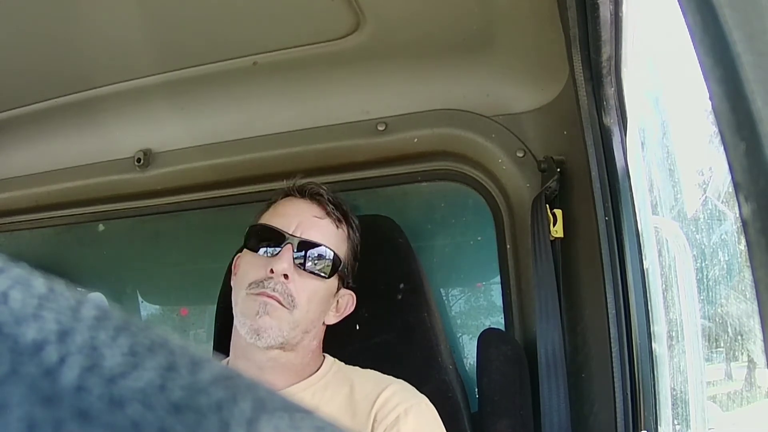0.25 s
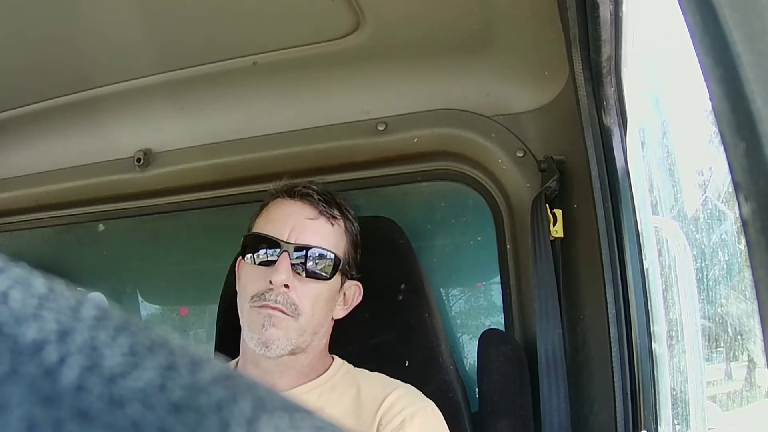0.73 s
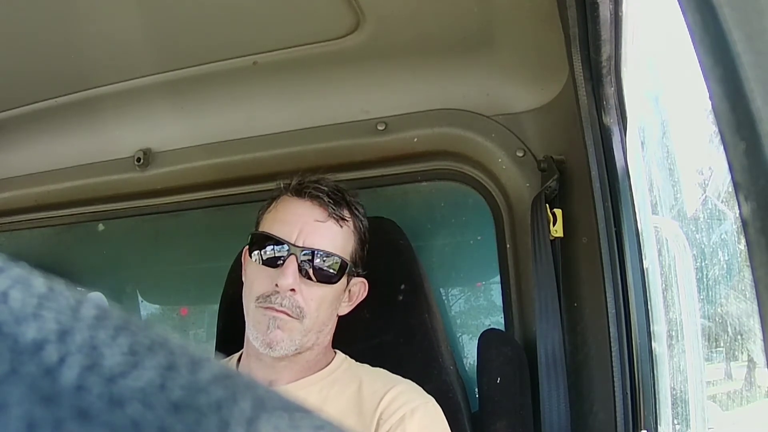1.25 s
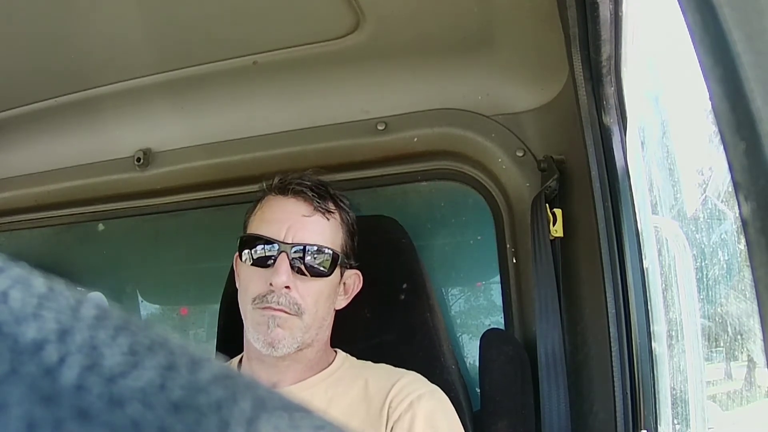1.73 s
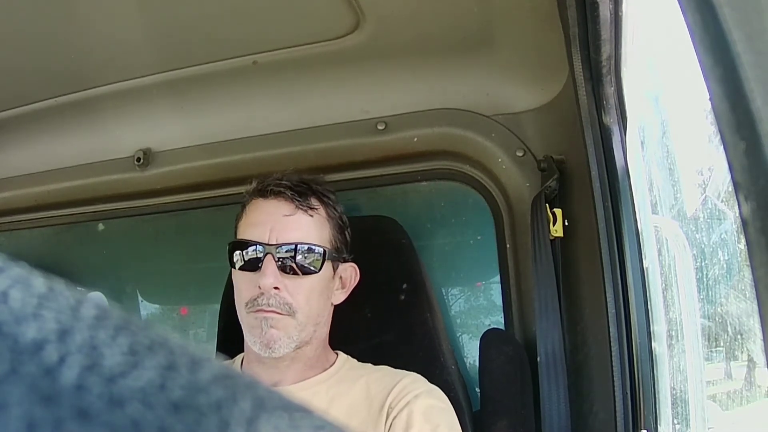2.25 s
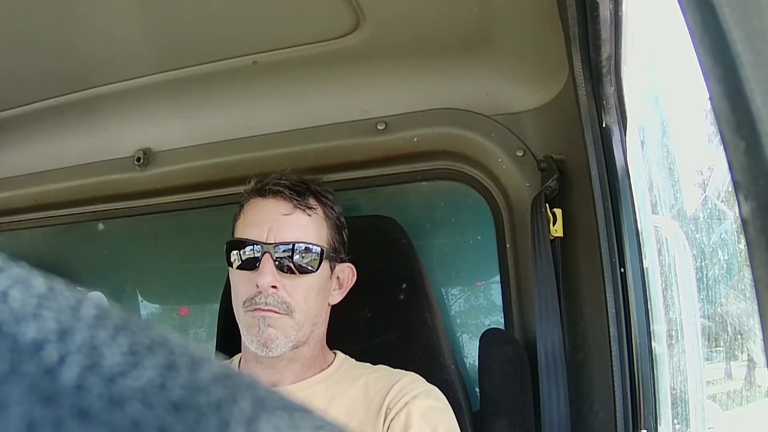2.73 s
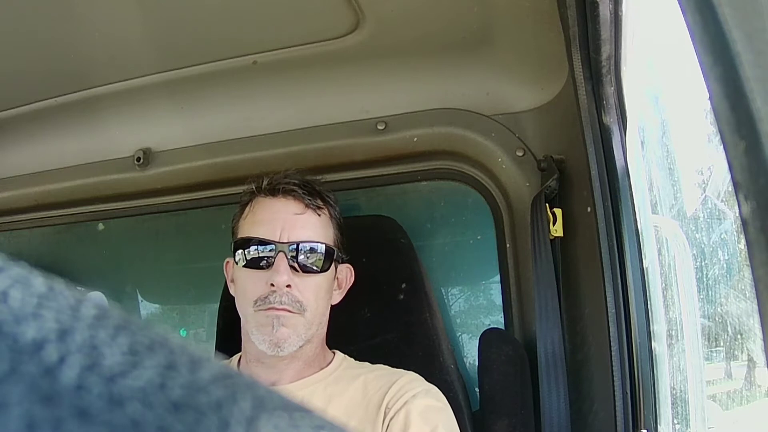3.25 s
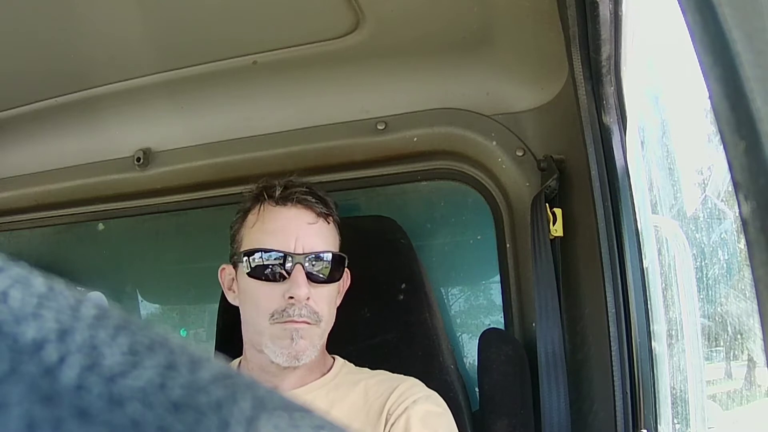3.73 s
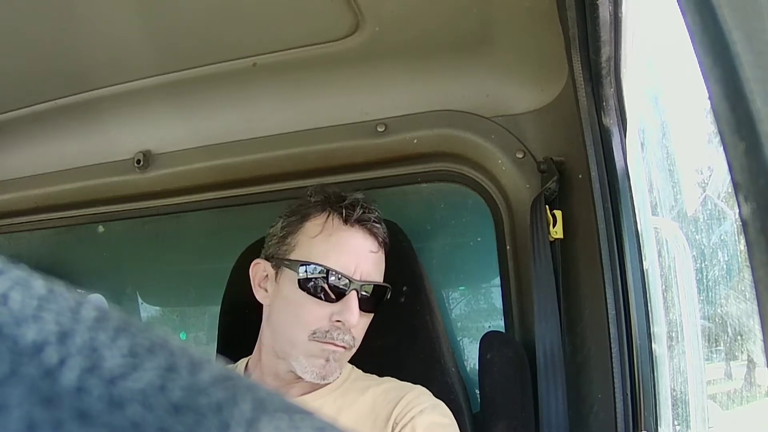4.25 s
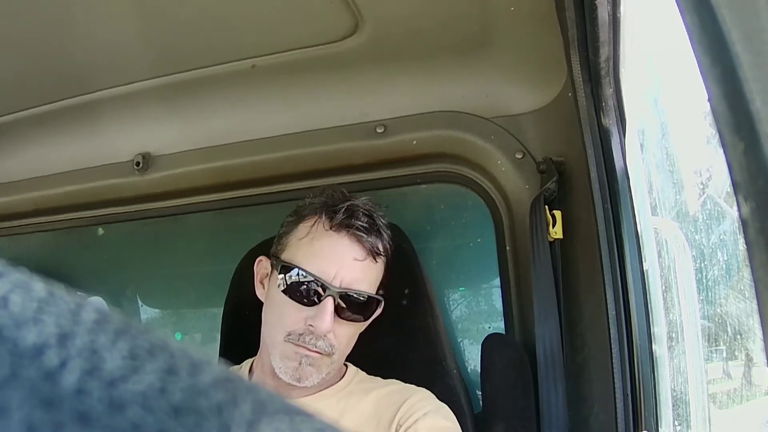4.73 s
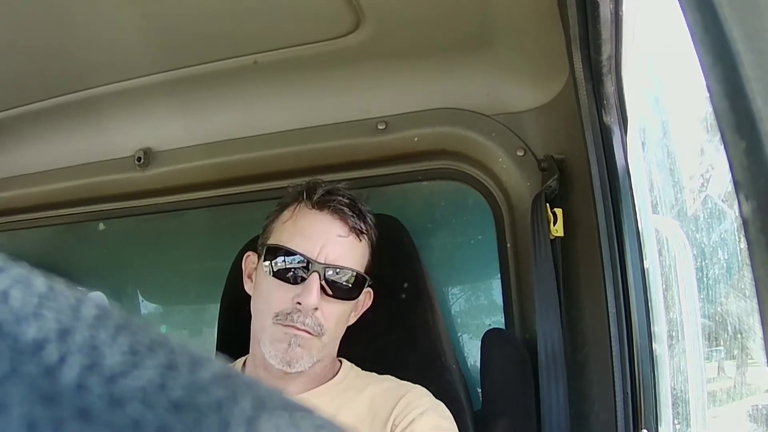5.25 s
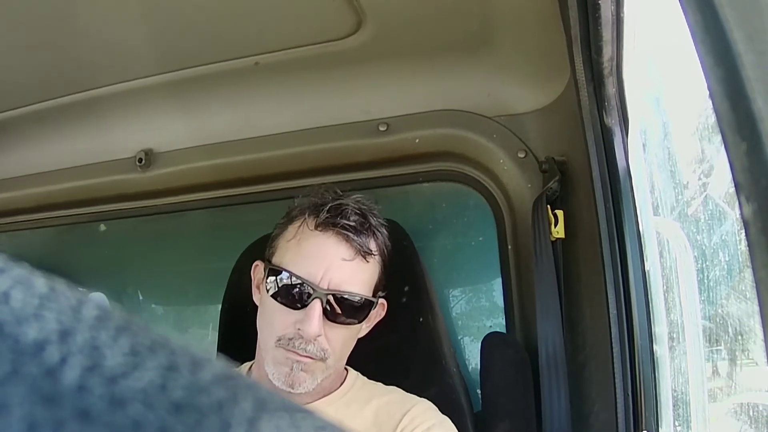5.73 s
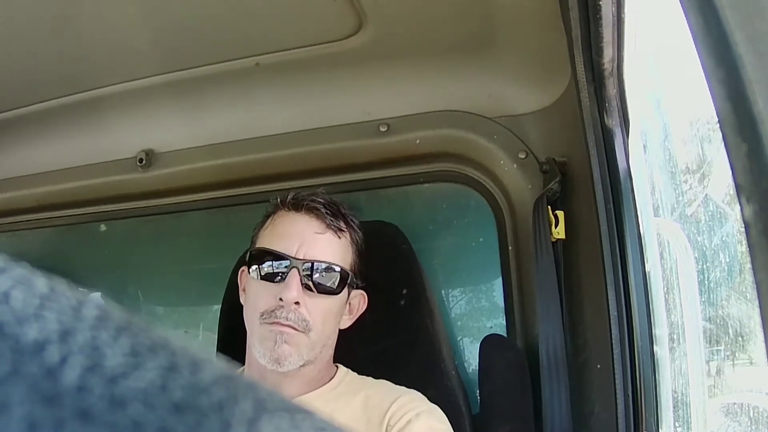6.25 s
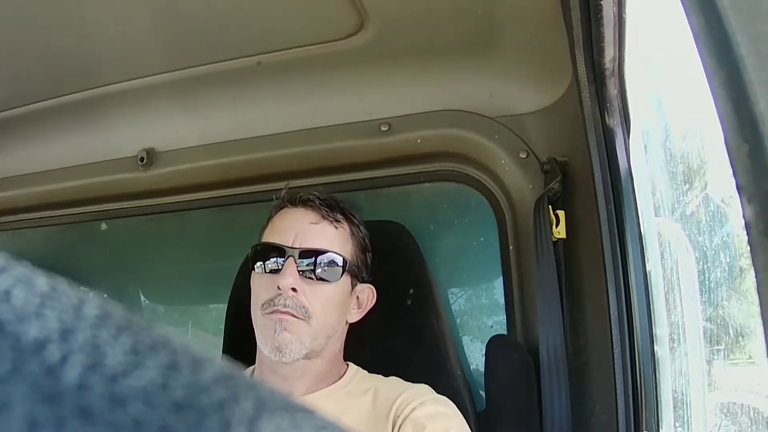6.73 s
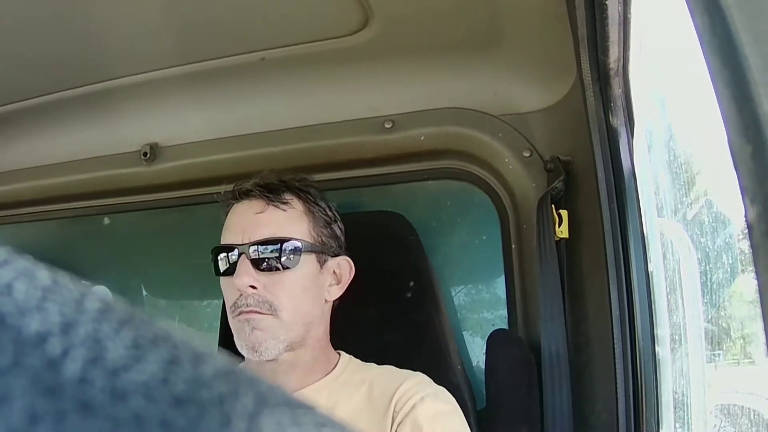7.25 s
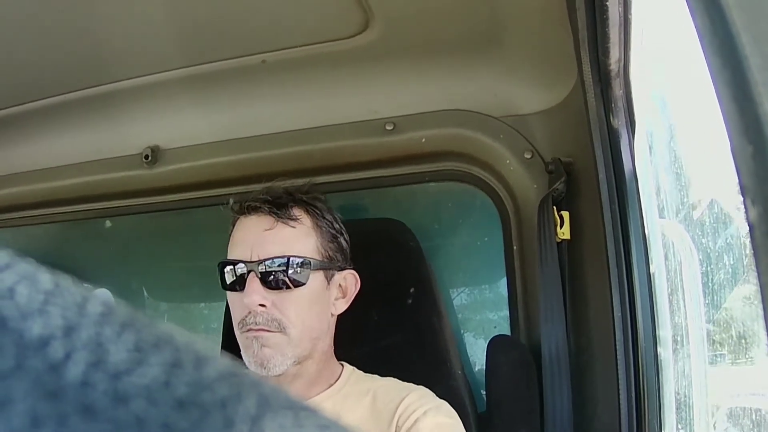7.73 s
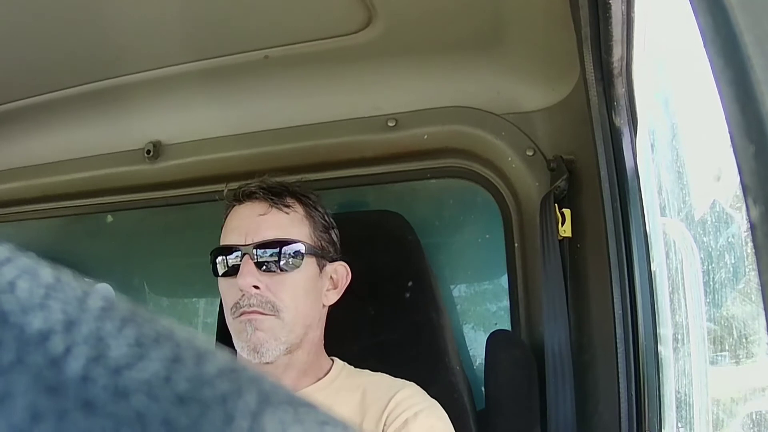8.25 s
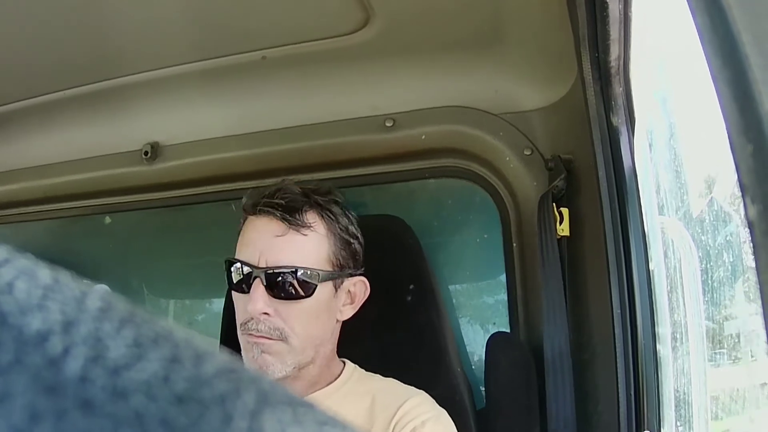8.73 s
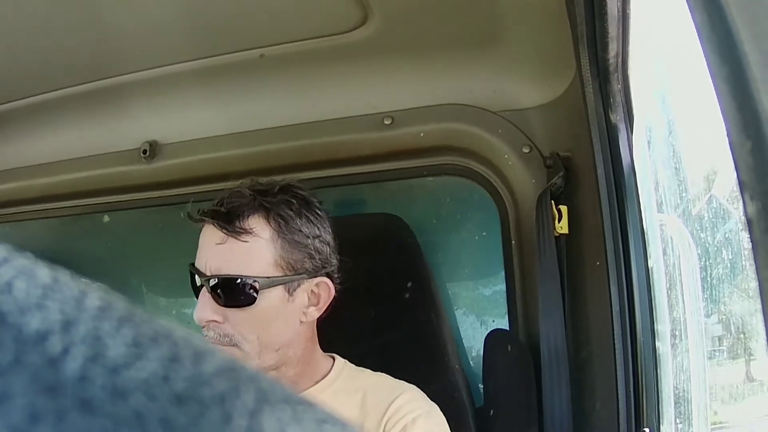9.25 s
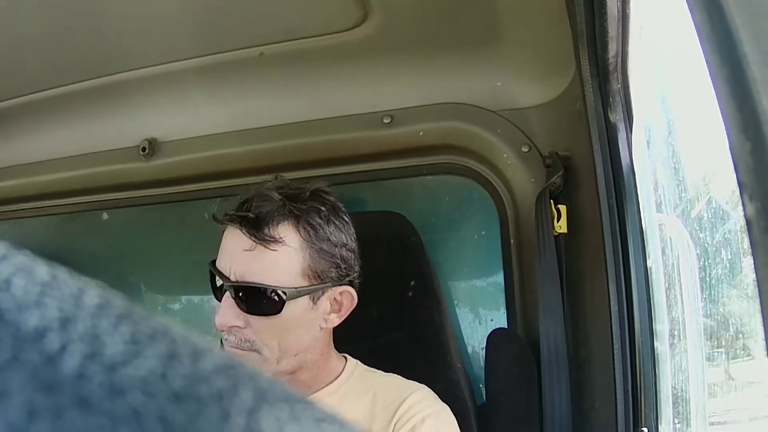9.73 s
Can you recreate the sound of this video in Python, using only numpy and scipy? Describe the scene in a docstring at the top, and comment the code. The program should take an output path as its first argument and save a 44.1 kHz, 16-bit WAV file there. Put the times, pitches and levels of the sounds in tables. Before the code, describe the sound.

Heard close up inside a truck cab, a diesel engine rumbles at a steady idle, then dips and shakes with a brief clatter as it takes the load. Its drone rises and falls three times as the truck moves off, with faint whines, squeaks and a thin turbo whistle. Late on, the gear lever clunks twice, with a short spit of air in between.

```python
"""Inside the cab of a six-cylinder diesel truck. The engine idles, lugs and shudders as the clutch bites,
then pulls away on three pushes of the pedal, the turbo whistling up behind each. Periodic combustion
forces the floor and panels into vibration, and the cab's resonances shape it into boom, drone and
clatter. Gears whine, loose trim rattles, the gear lever knocks home and an air valve spits a short jet."""
import sys
import numpy as np
from scipy import signal
from scipy.fft import rfft, irfft, next_fast_len
from scipy.io import wavfile
from scipy.ndimage import uniform_filter1d, map_coordinates

SR = 44100
rng = np.random.default_rng(int(sys.argv[2]) if len(sys.argv) > 2 else 0)


def unload_wav(signal):
    """Save mono or channel-first audio to the path in sys.argv[1] as 16-bit WAV at rate SR, clipped to [-1, 1]."""
    wavfile.write(
        sys.argv[1],
        SR,
        np.round(np.clip(np.atleast_2d(signal).T, -1, 1) * 32767).astype(np.int16),
    )


N = 440118
TIME = np.arange(N) / SR


def from_db(db):
    """Amplitude grows tenfold for every 20 dB."""
    return 10 ** (np.asarray(db) / 20)

def unit_rms(x):
    """Normalisation to a mean power of 1."""
    return x / np.sqrt(np.mean(x ** 2) + 1e-20)

def drift(rate):
    """Random modulation: rms 1, with `rate` new values a second."""
    knots = rng.standard_normal(12000)
    return unit_rms(np.interp(TIME * rate, np.arange(len(knots)), knots))

def tone(cycles):
    """Harmonic motion: a sine of rms 1 with a random starting phase."""
    return np.sqrt(2) * np.sin(2 * np.pi * (cycles + rng.random()))

def ring(x, hz, t60):
    """A damped resonator: a unit impulse starts a sine that falls 60 dB in t60 seconds."""
    r, w = from_db(-60 / (t60 * SR)), 2 * np.pi * hz / SR
    return signal.lfilter([0, np.sin(w)], [1, -2 * r * np.cos(w), r * r], x + 1e-18)

def lowpass(x, hz, order):
    """Butterworth filtering: 6 dB per octave per order above the corner."""
    return signal.sosfilt(signal.butter(order, hz, fs=SR, output="sos"), x)

def coloured(x, spectrum, resonances=()):
    """Source and filter: a curve of (Hz, dB) plus peaks of (Hz, width in Hz, dB) shapes x; rms 1."""
    size = next_fast_len(N)
    hz = np.arange(size // 2 + 1) * SR / size + 1e-3
    curve_hz, curve_db = np.transpose(spectrum)
    db = np.interp(np.log(hz), np.log(curve_hz), curve_db)
    db -= 24 * np.maximum(np.log2(curve_hz[0] / hz), 0)
    db -= 9 * np.maximum(np.log2(hz / curve_hz[-1]), 0)
    for centre, width, lift_db in resonances:
        db += lift_db / (1 + (2 * (hz - centre) / width) ** 2)
    return unit_rms(irfft(rfft(x, size) * from_db(db), size)[:N])

def noise(spectrum, resonances=()):
    """Filtered white noise takes on the spectrum of its filter; rms 1."""
    return coloured(rng.standard_normal(N), spectrum, resonances)

def held(start, end, attack, release):
    """A trapezoidal envelope, 0-1, that rises from `start` and falls from `end`; all in seconds."""
    return np.clip(np.minimum((TIME - start) / attack, 1 - (TIME - end) / release), 0, 1)

def bursts(rows):
    """Transient envelopes: a linear rise, then exponential decay."""
    out, t = np.zeros(N + SR), TIME[:SR // 3]
    for start, db, rise, decay in rows:
        envelope = np.minimum(t / rise, 1) * np.exp(-np.maximum(t - rise, 0) / decay)
        out[round(start * SR):][:len(t)] += from_db(db) * envelope
    return out[:N]

IDLE_RATE = 40.03  # firings per second
# Engine speed. Each row: time in seconds, firings per second.
ENGINE_SPEED = [(3.7, IDLE_RATE), (4.22, 43.9), (5.2, 31.4), (5.45, 40.3), (6.0, 56.6), (6.5, 72.5),
                (6.93, 81.7), (7.12, 68.6), (7.5, 57.5), (7.75, 63), (8.05, 67), (8.3, 55.5), (8.7, 55),
                (9.2, 53.2), (9.65, 64.4), (9.98, 61)]
def firing_rate():
    """The forcing frequency in Hz: three firings to each turn of the crankshaft."""
    return np.interp(TIME, *np.transpose(ENGINE_SPEED))

def clutch():
    """Friction coupling, 0-1: the clutch takes up the drive."""
    return np.interp(TIME, (3.64, 5.42), (0, 1))

def lug():
    """Overload, 0-1: the engine labours as the clutch bites."""
    return held(4.885, 5.21, attack=0.078, release=0.2)

# Pushes on the pedal. Each row: start in seconds, release in seconds, added share of full depth.
PUSHES = [(5.825, 6.81, 0.77), (7.453, 8.018, 0.56), (8.714, 9.574, 0.66)]
def pedal():
    """Throttle by superposition: a step to a light resting depth, plus the pushes."""
    resting = 0.33 * (TIME > 4.6)
    return resting + sum(depth * held(start, end, 0.63, 0.22) for start, end, depth in PUSHES)

def effort_db(law):
    """Level follows load. A law lists, in dB: base, gain in gear, at full pedal, per octave, in the lug."""
    base_db, gear_db, pedal_db, octave_db, lug_db = law
    octaves = np.log2(firing_rate() / IDLE_RATE)
    return base_db + gear_db * clutch() + pedal_db * pedal() + octave_db * octaves + lug_db * lug()

def critical_db(hz, half_width_hz, lift_db):
    """Resonance: the level swells with the pedal as the firing rate crosses a critical speed."""
    return lift_db * pedal() * np.exp(-((firing_rate() - hz) / half_width_hz) ** 2)

# Load laws of the shudder and the boom, in dB, ordered as in effort_db.
SHUDDER_LAW = (-40.5, -4.5, 4, -7.5, 2.5)
BOOM_LAW = (-42.5, 6.5, -1.5, 6, 6.5)
# Jolts of the cab. Each row: centre and half-length in seconds, shudder lift and boom lift in dB.
JOLTS = [(0.548, 0.21, 0, 4), (3.94, 0.12, 4, 10), (4.282, .1, 4, 6.5), (4.994, 0.19, 15, 5),
         (5.302, 0.054, -4, 7.5), (5.457, 0.14, 12, 0.5), (6.048, 0.065, 10, 8.5), (6.583, 0.028, 6, 8),
         (6.924, 0.088, 4, 2.5), (8.41, 0.1, 10.5, 2), (9.106, 0.19, 15, 5.5), (9.72, 0.18, 9, 0.5)]
def floor_levels():
    """Forced vibration: shudder and boom, in dB, follow the load and the cab's rocking on its mounts."""
    shudder_db = effort_db(SHUDDER_LAW)
    boom_db = effort_db(BOOM_LAW) + critical_db(hz=84.7, half_width_hz=7.5, lift_db=13.4)
    for centre, half_length, shudder_lift_db, boom_lift_db in JOLTS:
        swell = np.exp(-((TIME - centre) / half_length) ** 2)
        shudder_db += shudder_lift_db * swell
        boom_db += boom_lift_db * swell
    return shudder_db, boom_db

def panel_resonance_db():
    """The panels resonate at a critical speed of their own."""
    return critical_db(hz=71.4, half_width_hz=3.04, lift_db=7.3)

def combustion(firings, repeat, throb_db, uneven_db):
    """Cyclic excitation: a six-firing pattern (power share `repeat`) and turbulence pulse each stroke."""
    pattern = rng.standard_normal(2048)
    cycle = map_coordinates(pattern, [firings / 6 % 1 * len(pattern)], order=1, mode="grid-wrap")
    shake = np.sqrt(repeat) * unit_rms(cycle) + np.sqrt(1 - repeat) * rng.standard_normal(N)
    strength_db = uneven_db * rng.standard_normal(1000)[firings.astype(int)]
    return shake * from_db(strength_db - throb_db * (firings % 1 - .5))

# Resonances of the cab. Each row: frequency in Hz, width in Hz, lift in dB.
CAB_MODES = [(112.2, 5.4, 6.5), (165, 21.3, 17), (321.7, 17, 10.5), (477.7, 53, 10.5), (612.5, 57, 8),
             (709, 40, 7), (1046, 230, 10.5), (4370, 500, 3.5), (4840, 180, 4.5)]
# Responses of four paths into the cab. Each row: frequency in Hz, relative gain in dB.
BOOM_PATH = [(30, -6), (55, -20), (85, -3), (130, -3.5), (190, -7.5), (260, -17), (500, -45)]
DRONE_PATH = [(120, -52), (200, 3), (260, -4.5), (380, -7), (520, -7.5), (680, -32.5), (1400, -62)]
CLATTER_PATH = [(350, -29), (560, -3), (850, 2.5), (1080, -11), (1300, -8), (1600, -18.5), (2200, -26.5),
                (5000, -47)]
HISS_PATH = [(1000, -25.5), (1600, 6.5), (2000, 3), (2600, -2), (3400, -11.5), (4500, -10), (5700, -17.5),
             (7300, -19.5), (9000, -30)]
# Load laws of the upper three paths, in dB, ordered as in effort_db.
DRONE_LAW = (-47.5, -0.5, 5.5, 6, 10.5)
CLATTER_LAW = (-49.5, 3.5, 4.5, 5, 6.5)
HISS_LAW = (-67.5, 3, 6, 3, 6.5)
def engine_in_cab(firings, in_gear):
    """Transmission: floor, panels and firewall filter the combustion, which throbs harder in the lug."""
    boom_db, lugging = floor_levels()[1], lug()
    boom = combustion(firings, repeat=0.028, throb_db=-1, uneven_db=1 + 1.6 * in_gear)
    drone = combustion(firings, repeat=0.13, throb_db=0.5, uneven_db=1.05)
    clatter = combustion(firings, repeat=0.16, throb_db=0.3 + 7.1 * lugging, uneven_db=0.54 + lugging)
    hiss = combustion(firings, repeat=0.056, throb_db=2 + 5.9 * lugging, uneven_db=1 + lugging)
    boom = from_db(boom_db - 2 - 2.16 * in_gear) * coloured(boom, BOOM_PATH, CAB_MODES[:1])
    drone = from_db(effort_db(DRONE_LAW) + panel_resonance_db()) * coloured(drone, DRONE_PATH, CAB_MODES)
    clatter = from_db(effort_db(CLATTER_LAW)) * coloured(clatter, CLATTER_PATH, CAB_MODES)
    hiss = from_db(effort_db(HISS_LAW)) * coloured(hiss, HISS_PATH, CAB_MODES)
    return boom + drone + clatter + lowpass(hiss, hz=8200, order=4)

# Exhaust partials at idle and in gear. Each row: multiple of the firing rate, relative level in dB.
IDLE_ORDERS = [(3, -58), (4, -43)]
DRIVE_ORDERS = [(1.5, -2.1), (2, 0), (2.3, -9), (16 / 6, -5.5), (3, -2.5), (4, -.5)]
def exhaust_hum(firings, in_gear):
    """Modal excitation: the firing rate shakes the cab; its multiples swell as they cross air modes."""
    shudder_db, boom_db = floor_levels()
    idle = sum(from_db(db + .5 * drift(8)) * tone(k * firings) for k, db in IDLE_ORDERS)
    orders = sum(from_db(db + 3.7 * drift(22)) * tone(k * firings) for k, db in DRIVE_ORDERS)
    hum = coloured(orders, BOOM_PATH, CAB_MODES)
    hum /= np.sqrt(uniform_filter1d(hum ** 2, size=8000) + 0.029)  # evens out the overall level
    rumble = noise([(26, 13.5), (45, 13), (70, 13), (140, -48.5)])
    shudder = tone(firings) + (.2 + .55 * in_gear * (1 - lug())) * rumble
    exhaust = (1 - in_gear) * idle + in_gear * from_db(boom_db - 2.5) * hum
    return exhaust + from_db(shudder_db - 4.5) * shudder

# Cylinders in firing order. Each row: relative level in dB, delay as a share of the firing interval.
CYLINDERS = [(-3.5, 0.12), (-1.5, 0.055), (0.2, 0.1113), (-7, 0.046), (-0.5, 0.025), (-1.5, 0.1135)]
# Modes of the engine block. Each row: frequency in Hz, relative level in dB, t60 in seconds.
BLOCK_MODES = [(471, -10.5, .07), (613, -8.5, 0.087), (689, -1.5, 0.06), (738.3, -0.3, 0.095)]
# Spectrum of the turbulent wash. Each row: frequency in Hz, relative level in dB.
WASH_SPECTRUM = [(450, -43.5), (590, 0), (650, -10), (690, -1.5), (740, 3), (785, -13), (1000, -24),
                 (1500, -49)]
def diesel_knock(firings, in_gear):
    """Impulse response: each ignition rings the block over a wash of turbulence, softer under load."""
    strokes = np.arange(1, int(firings[-1]) - 1)
    db, delay = np.array(CYLINDERS)[strokes % len(CYLINDERS)].T
    timing_scatter, level_scatter = rng.standard_normal((len(strokes), 2)).T
    onsets = np.searchsorted(firings, strokes + delay + 0.0074 * timing_scatter)
    ignitions = np.zeros(N)
    ignitions[np.minimum(onsets, N - 1)] = from_db(db + 0.5 * level_scatter)
    block = sum((-1) ** k * from_db(mode_db) * ring(ignitions, hz, t60)
                for k, (hz, mode_db, t60) in enumerate(BLOCK_MODES))
    wash = coloured(combustion(firings, repeat=.1, throb_db=4, uneven_db=1), WASH_SPECTRUM)
    return from_db(-9 * in_gear) * (from_db(-45.5) * unit_rms(block) + from_db(-51) * wash)

def growl(firings, in_gear):
    """Swept resonance: under load, crankshaft orders 13 to 27 swell as they cross the panel modes."""
    orders = sum(tone(k * firings / 3) * from_db(3 * drift(20)) for k in range(13, 28))
    panels = coloured(orders, [(290, 11), (500, 0.5), (600, -20.5)], CAB_MODES)
    return in_gear * from_db(effort_db(DRONE_LAW) + panel_resonance_db() + 0.56) * panels

# Mesh tones of the timing gears. Each row: multiple of the firing rate, base level in dB.
GEAR_ORDERS = [(46 / 6, -61), (72 / 6, -58), (110 / 6, -52), (124 / 6, -56)]
def gear_whine(firings, in_gear):
    """Tooth meshing gives clean tones at idle; under load, backlash roughens their phase."""
    rate, whine = firing_rate(), 0
    load_db = -2.5 * in_gear + 1.6 * panel_resonance_db()
    for k, db in GEAR_ORDERS:
        backlash = .36 * in_gear * drift(90)
        waver_db = (1.2 + 2.3 * in_gear) * drift(11)
        firewall = 1 / np.hypot(1, (k * rate / 1200) ** 7)  # shuts out pitches above 1200 Hz
        whine += from_db(db + load_db + waver_db) * firewall * tone(k * firings + backlash)
    return whine

# Spooling of the turbo. Each row: time in seconds, compressor blade-passing frequency in Hz.
TURBO_SPEED = [(5.0, 6200), (5.85, 8700), (6.7, 14800), (6.88, 15200), (7.22, 12900), (7.66, 11600),
               (8.08, 14100), (8.72, 10500), (9.65, 15200), (9.98, 12900)]
def turbo(in_gear):
    """Blade-passing tones: 14 compressor and 9 turbine blades whistle, louder the faster they spin."""
    blade_hz = np.interp(TIME, *np.transpose(TURBO_SPEED))
    blade_hz = uniform_filter1d(blade_hz, size=SR // 6)  # rotor inertia
    shaft_turns = np.cumsum(blade_hz * (1 + .009 * drift(1000))) / SR / 14
    compressor, turbine = (tone(blades * shaft_turns) * drift(600) * from_db(2 * drift(14))
                           for blades in (14, 9))  # fast modulation makes each tone breathy
    spin = blade_hz / blade_hz.max()
    return in_gear * (from_db(-85) * spin * compressor + from_db(-84.5) * spin ** 3 * turbine)

# Blows on the gear lever and cab. Each row: start in seconds, level in dB, most excited pitch in Hz.
BLOWS = [(4.952, -17.5, 860), (5.049, -22, 943), (5.079, -24, 900), (5.113, -26, 850), (5.173, -25, 865),
         (5.324, -35, 160), (8.470, -11, 150), (8.498, -11, 149.5), (8.516, -23, 900), (8.526, -7, 1042),
         (8.532, -10.5, 483), (8.563, -18, 395.2), (9.845, -18.5, 674), (9.864, -7.5, 680),
         (9.88, -17.5, 560)]
# Modes of the lever and its mounting. Each row: frequency in Hz, relative level in dB, t60 in seconds.
LEVER_MODES = [(169.4, 16.5, 0.079), (210, 9.5, 0.12), (293, 0.5, 0.16), (363, -4, 0.18), (433, 4, 0.084),
               (592, -1, 0.08), (625, 3.5, 0.053), (732, 10, 0.025), (905, 5.5, 0.043), (1002, -9, 0.06),
               (1200, -12, 0.028), (1600, -21, 0.036), (1800, -20, 0.043), (1970, -22, 0.023),
               (2590, -2, 0.018)]
def lever_knocks():
    """Impact excitation: a brief scrunch of contact rings the lever's modes, most near one pitch."""
    out, t = np.zeros(N + SR), TIME[:SR // 3]
    for start, db, centre_hz in BLOWS:
        contact = from_db(-28) * rng.standard_normal(len(t)) * np.exp(-t / 0.018)
        contact[0] += 1
        blow = 0
        for k, (hz, mode_db, t60) in enumerate(LEVER_MODES):
            polarity, octaves_off = (-1) ** (k // 5), abs(np.log2(hz / centre_hz))
            blow += polarity * from_db(mode_db - 9.3 * octaves_off) * ring(contact, hz, t60)
        blow = lowpass(blow, hz=2600, order=2)
        blow /= np.sqrt(np.sum(blow ** 2) / (0.0018 * SR))  # the energy of 1.8 ms at rms 1
        out[round(start * SR):][:len(t)] += from_db(db) * blow
    return out[:N]

def panel_rattles(peak_clicks_per_s=260):
    """Random impacts: loose panels chatter with a thin metallic ring, densest in mid-lug."""
    density = lug() * np.exp(-((TIME - 5.11) / 0.14) ** 2)
    hits = rng.random(N) < peak_clicks_per_s * density / SR
    clicks = hits * from_db(2.5 * np.minimum(rng.exponential(1, N), 2))
    envelope = signal.lfilter([1], [1, -np.exp(-1 / (0.003 * SR))], clicks + 1e-18)  # 3 ms decay
    spectrum = [(230, 17), (700, -9), (1050, -4), (1300, -13), (1600, 0), (2900, -15), (3400, -24),
                (7000, -34)]
    metal = noise(spectrum, resonances=[(4370, 400, 16)])
    return lowpass(from_db(-48) * envelope * metal, hz=5000, order=4)

# Short whines and squeaks. Each row: centre and half-length in seconds, pitch in Hz, glide in Hz per
# second, level in dB.
SHORT_TONES = [(3.857, 0.083, 2330, -400, -70), (3.98, .05, 321, 0, -37.5), (3.992, 0.036, 1062, 0, -44.5),
               (4.785, .022, 4120, 0, -69), (5.851, 0.11, 989, 904, -44), (5.93, .11, 2130, 1300, -62.5),
               (6.4, 0.13, 1344, 197, -50), (6.71, .075, 3050, 1200, -60), (6.866, .055, 3170, 201, -62.5),
               (9.021, 0.16, 1062, 272, -43)]
def whines_and_squeaks(rasp_cycles=0.14, flutter_depth=0.48):
    """Modulated tones: gears whine upward, the intake rings briefly, a mount groans and trim squeaks."""
    out = 0
    for centre, half_length, hz, glide, db in SHORT_TONES:
        t = TIME - centre
        swell = np.exp(-(t / half_length) ** 2)
        voice = tone(hz * t + glide * t ** 2 / 2 + rasp_cycles * drift(200))
        out += from_db(db) * swell * voice * (1 + flutter_depth * drift(100))
    return out

# Clicks of loose trim. Each row: start in seconds, relative level in dB.
TICKS = [(4.9313, -56), (4.9526, -53), (5.024, -58), (5.0814, -48), (5.1802, -53), (5.2136, -57),
         (6.1714, -46.5), (6.6603, -49), (8.2262, -53), (8.4425, -50), (8.531, -43), (8.6328, -44.5),
         (8.7943, -56)]
# Scuffs of seat and linkage. Each row: start in seconds, level in dB, rise and decay in seconds.
SCUFFS = [(5.435, -54, .025, .025), (5.6, -57, .01, .023), (6.175, -48.5, 0.0048, 0.034),
          (6.67, -52, 0.013, 0.042), (7.082, -42, 0.0019, 0.012), (7.296, -52, 0.0053, 0.023),
          (8.04, -49, 0.027, 0.02), (8.465, -50.5, 0.037, 0.017), (9.678, -53, 0.0039, 0.014),
          (9.86, -53.5, 0.017, 0.027)]
# Spectra of both. Each row: frequency in Hz, relative level in dB.
TICK_SPECTRUM = [(3000, -36), (5300, -10), (6300, -5), (8000, -14), (11000, -18.5), (15000, -37)]
SCUFF_SPECTRUM = [(900, -10), (2000, 4), (3200, -8.5), (4900, -2.5), (6500, -19), (8000, -24.5),
                  (15000, -41)]
def trim():
    """Contact noise: loose fittings click and scuff as the cab rocks."""
    ticks = bursts([(start, db - 6.5, .0004, .0018) for start, db in TICKS]) * noise(TICK_SPECTRUM)
    return ticks + bursts(SCUFFS) * noise(SCUFF_SPECTRUM)

# Venting of the valve. Each row: start in seconds, level in dB, rise and decay in seconds.
VENTS = [(8.884, -33.5, 0.012, 0.018)]
# Spectrum of its jet. Each row: frequency in Hz, relative level in dB.
JET_SPECTRUM = [(1060, -31), (1800, -6), (2010, -2), (2190, -12), (3510, -9), (4010, -2.5), (5030, 1.5),
                (5550, -10), (6470, -9), (9360, -15), (10100, -9), (15500, -18)]
def air_valve():
    """Jet noise: the gearbox valve vents a puff that whistles at the resonances of its port."""
    port_modes = [(2010, 62, 7.8), (5160, 160, 7.2), (6290, 92, 17)]
    return bursts(VENTS) * noise(JET_SPECTRUM, port_modes)

# Spectrum of the intake. Each row: frequency in Hz, relative level in dB.
INTAKE_SPECTRUM = [(3800, -12), (4250, 1.5), (4600, -10.5), (5400, -23), (11000, -16), (13000, -39)]
def intake():
    """Flow noise: drawn air hisses once the engine takes load, growing with the pedal."""
    flow = np.clip((TIME - 4.75) / 0.026, 0, 1) * (.5 + .5 * pedal())
    return from_db(-73.5) * flow * noise(INTAKE_SPECTRUM)

# Spectrum of the background. Each row: frequency in Hz, relative level in dB.
BACKGROUND_SPECTRUM = [(2000, 3), (5000, 0.5), (9000, 1), (15500, 0.5)]
def background_hiss():
    """The noise floor: a faint, steady, high hiss."""
    return from_db(-75.5) * noise(BACKGROUND_SPECTRUM)

def scene():
    """Superposition: all sources add at the dashboard, in one channel."""
    firings = np.cumsum(firing_rate()) / SR + .15  # engine phase, counted in firings
    in_gear = clutch()
    engine = exhaust_hum(firings, in_gear) + diesel_knock(firings, in_gear)
    engine += engine_in_cab(firings, in_gear) + growl(firings, in_gear) + gear_whine(firings, in_gear)
    air = turbo(in_gear) + intake() + background_hiss()
    transients = lever_knocks() + panel_rattles() + whines_and_squeaks() + trim() + air_valve()
    return (engine + air + transients)[None]

def record(dry):
    """Band limiting: a steep elliptic low-pass cuts the treble above 15.6 kHz."""
    return signal.sosfilt(signal.ellip(10, .2, 80, 15600, fs=SR, output="sos"), dry)

dry = scene()
out = record(dry)
unload_wav(out)
```